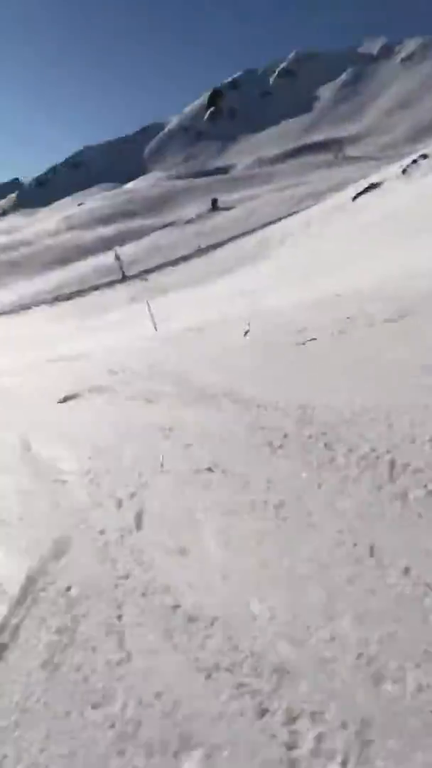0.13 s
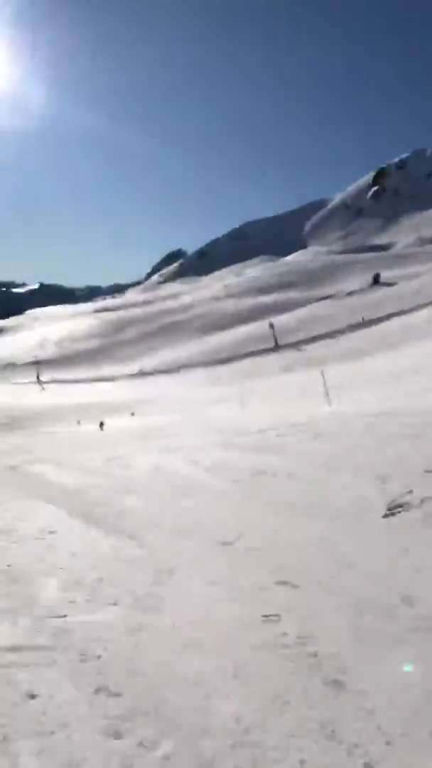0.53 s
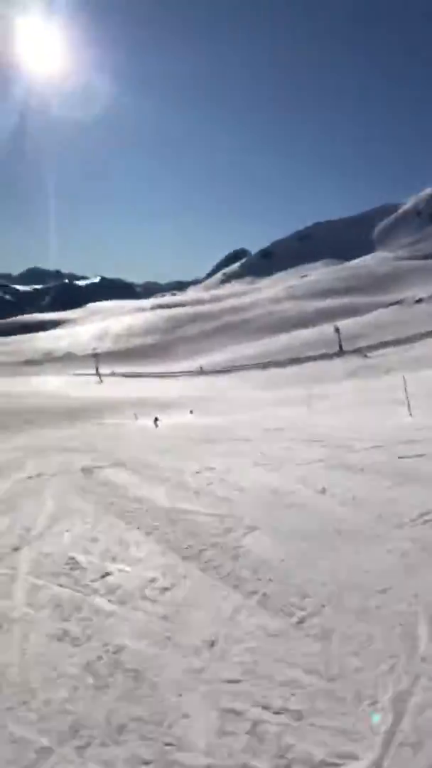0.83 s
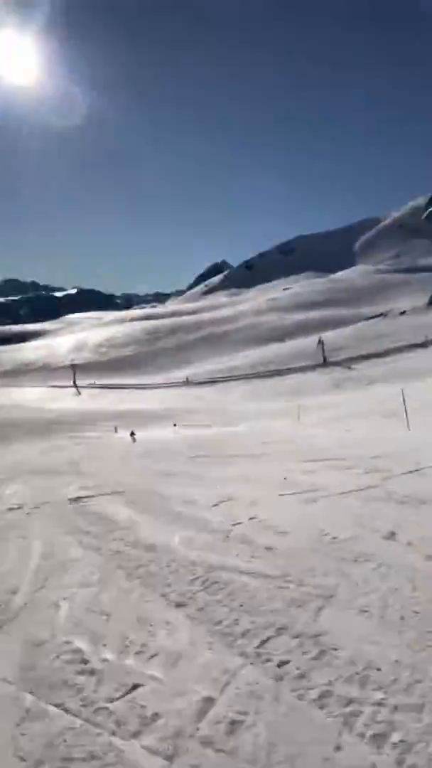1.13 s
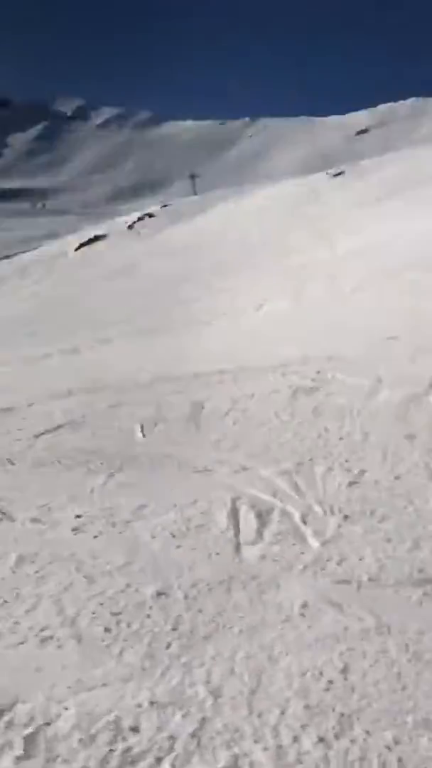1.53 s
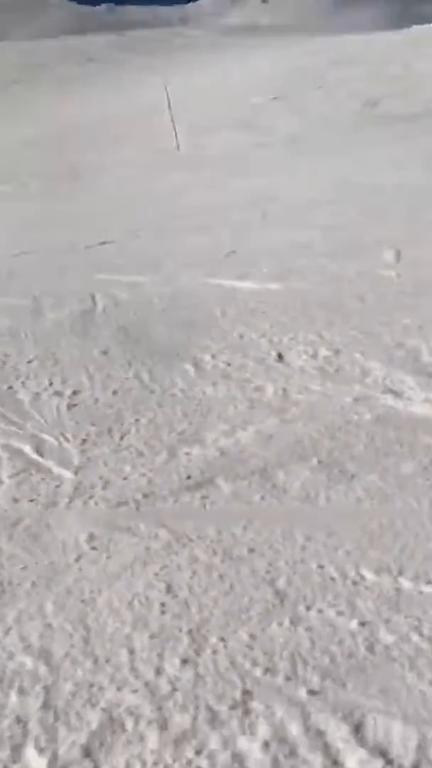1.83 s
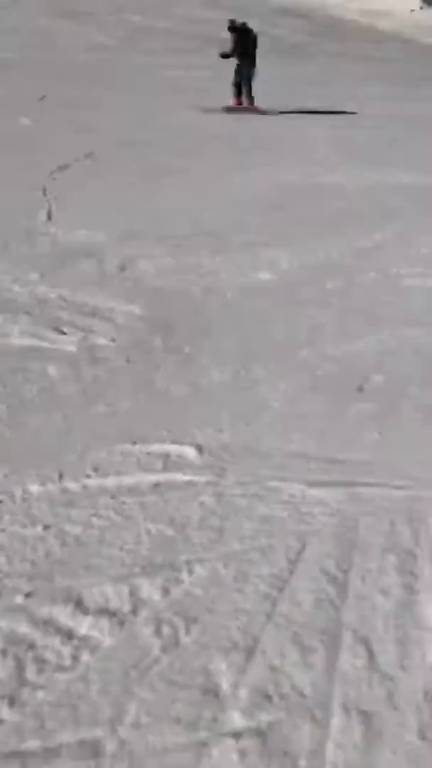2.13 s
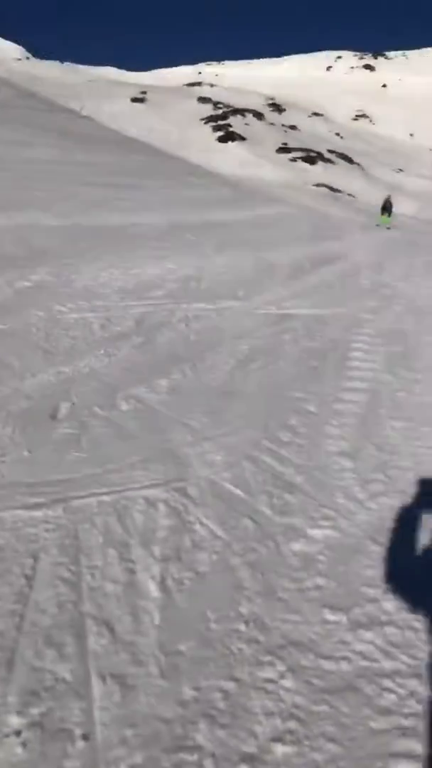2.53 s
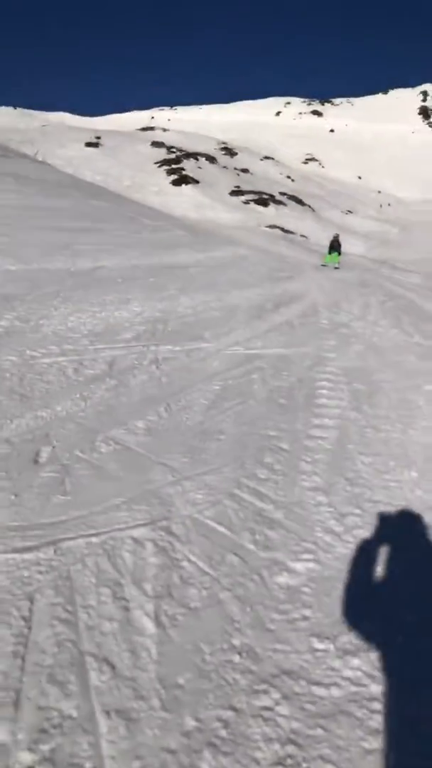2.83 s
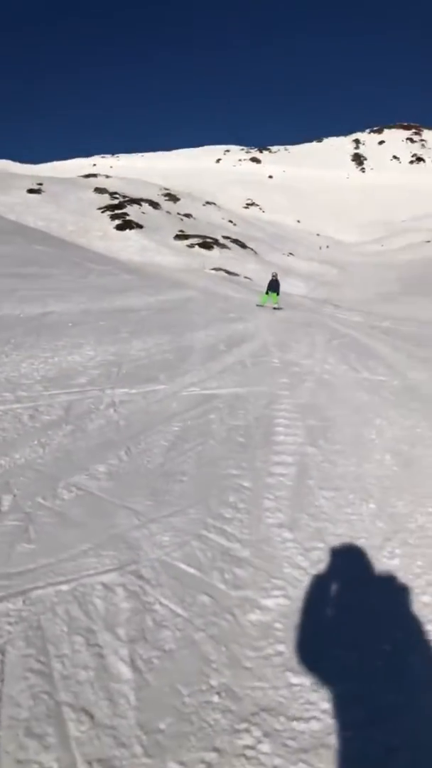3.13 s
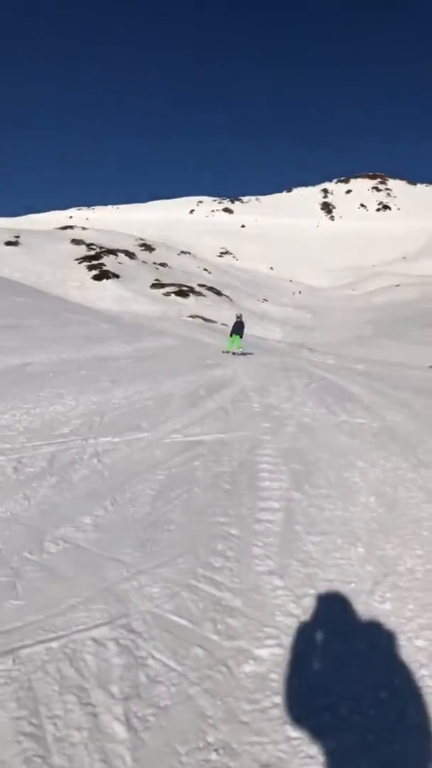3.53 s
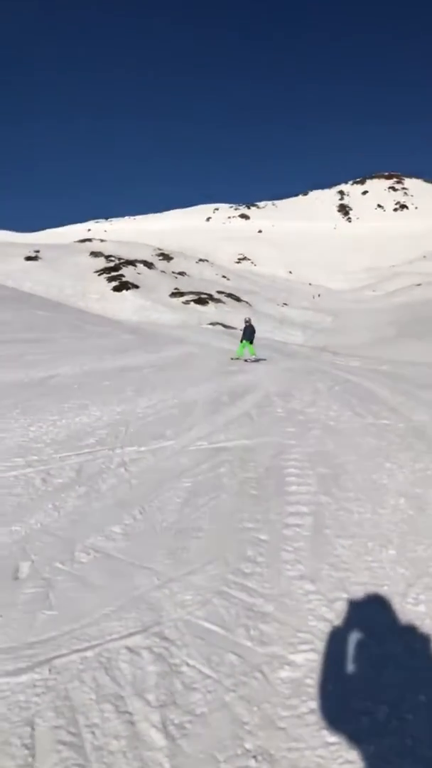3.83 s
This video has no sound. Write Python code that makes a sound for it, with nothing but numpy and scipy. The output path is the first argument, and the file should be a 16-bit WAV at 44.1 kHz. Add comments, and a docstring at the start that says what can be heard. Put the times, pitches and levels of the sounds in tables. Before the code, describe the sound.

Loud gritty scraping of a board on packed snow starts at once, with low rumble, hollow knocks and some wind buffeting. From 0.25 s spray hisses brightly, and the rough, ringing scrape continues until about 2 s. It then smooths and fades, ending in a tiny knock at 2.9 s. Near quiet follows: soft handling thumps, a very faint rising squeak at 3.2 s, a crunch at 3.7 s, and a distant skier's thin hiss growing.

```python
"""Carving to a stop on packed snow

A rider carves across an open slope, brakes sideways and comes to rest; one microphone, held in the hand.
Snow grains crush under the base and set the board ringing: random clicks into decaying sines, over coloured noise.
Spray hisses off the edge and wind buffets the microphone, both as noise on drifting levels.
After the stop: a knock, crunches underfoot, soft thumps as the hand shifts, a faint rising tone,
and the thin hiss of another skier coming nearer."""
import sys
import numpy as np
from scipy import signal
from scipy.fft import rfft, irfft
from scipy.io import wavfile

SR = 44100
rng = np.random.default_rng(int(sys.argv[2]) if len(sys.argv) > 2 else 0)


def pcm_store(signal):
    """Save signal as 16-bit PCM."""
    levels = np.round(np.clip(np.atleast_2d(signal), -1, 1) * 32767)
    wavfile.write(sys.argv[1], SR, levels.astype(np.int16).T)


N = 176400   # samples: 4 s


def from_db(db):
    """Decibels to amplitude."""
    return 10 ** (np.asarray(db) / 20)


def rms_one(x):
    """Scale to an rms of 1."""
    return x / np.sqrt(np.mean(x ** 2) + 1e-20)


def seconds():
    """The time of every sample, in s."""
    return np.arange(N) / SR


def in_time(rows, before=None, after=None):
    """Straight lines between the rows' points, one curve for each column after the time."""
    s, *columns = np.transpose(rows)
    return [np.interp(seconds(), s, column, left=before, right=after) for column in columns]


def drift(rate_hz):
    """Slow chance with spread 1: noise through two equal low-pass poles, drawn at every 20th sample."""
    step = 20
    pole = np.exp(-2 * np.pi * rate_hz * step / SR)
    noise = rng.standard_normal(N // step + 2002)
    slow = signal.lfilter([1], [1, -2 * pole, pole * pole], noise)[2000:]   # skip the filter's start
    return np.interp(np.arange(N) / step, np.arange(len(slow)), rms_one(slow))


def ring(clicks, hz, t60_s):
    """A resonance: a unit click sets off a sine of height 1 that falls 60 dB in t60_s."""
    radius = from_db(-60 / (t60_s * SR))
    angle = 2 * np.pi * hz / SR
    tiny = 1e-18   # keeps the filter out of very slow arithmetic
    return signal.lfilter([0, np.sin(angle)], [1, -2 * radius * np.cos(angle), radius * radius], clicks + tiny)


def random_sizes_db(spread_db):
    """Mostly small, now and then large: exponential chance, capped at five times the spread."""
    return spread_db * np.minimum(rng.exponential(1, N), 5)


def coloured(spectrum, grit_db=0.0):
    """Noise with the given colour and an rms of 1; grit makes single samples stand out."""
    hz, db = np.transpose(spectrum)
    bins_hz = np.maximum(np.arange(N // 2 + 1) * SR / N, 1)
    noise = rng.standard_normal(N) * from_db(random_sizes_db(grit_db))
    colour = from_db(np.interp(np.log(bins_hz), np.log(hz), db))
    return rms_one(irfft(rfft(noise) * colour, N))


# Four layers of the glide: time_s, rumble_db, scrape_db, spray_db, spray_top_db
GLIDE_LEVELS = [(0, -31.5, -32, -40, -40), (.23, -35, -36, -40, -40), (.26, -43, -44, -35.5, -36),
                (.3, -35, -33.5, -34.5, -34), (.8, -38.5, -29.5, -31.5, -34), (1.05, -40, -33, -32.5, -36),
                (1.4, -41, -34, -35, -37.5), (1.65, -40, -31, -36.5, -39.5),
                (1.95, -40.5, -35.5, -39.5, -42.5), (2.2, -44.5, -42, -46, -50.5),
                (2.33, -48, -46, -47, -53.5), (2.5, -53, -49.5, -53, -62.5), (2.52, -57, -55, -58, -64),
                (2.75, -66, -57, -60.5, -65.5), (2.9, -63, -63, -66, -79)]
# Level of the board's ringing, off after the last row: time_s, level_db
RINGING_LEVEL = [(0, -48), (.26, -40), (.5, -44), (.68, -35), (.75, -36.5), (1.08, -35), (1.16, -41),
                 (1.3, -36), (1.62, -39), (2.05, -50), (2.33, -44), (2.5, -73)]
# Colour of the low rumble of the board: freq_hz, relative_db
RUMBLE_COLOUR = [(59, -35), (100, -17), (151, -3), (249, -1), (700, -3), (910, -2), (1200, -61)]
# Colour of the scrape, also of the puffs at the knocks: freq_hz, relative_db
SCRAPE_COLOUR = [(290, -27), (500, -12), (1180, -2.5), (1780, -5), (2600, -18.5), (4000, -33)]
# Colour of the spray off the edge: freq_hz, relative_db
SPRAY_COLOUR = [(1290, -13), (2200, -0.5), (2460, -3), (3320, -0.5), (5850, -4), (8000, -12), (11500, -40)]
# Colour of the top of the spray: freq_hz, relative_db
SPRAY_TOP_COLOUR = [(4120, -12), (7000, -4.5), (9340, -4.5), (15700, -5)]
# Modes of the board, also rung by the knocks: freq_hz, relative_db, undamped_t60_s
BOARD_MODES = [(150, -16, .07), (330, -14, .035), (780, -8, .025), (1050, -11, .012), (1340, 1, .06),
               (1530, -8, .04), (1750, -8, .04), (3290, -17, .025), (5130, -19, .025)]
GRAINS_PER_S, GRAIN_SPREAD_DB = 1500, 2
CHATTER_HZ, CHATTER_DB = 25, 0.55   # ridges in the snow shake every layer together
SMOOTH_FROM_S, SMOOTH_SHARE = 2.3, 0.25   # the slow slide at the end is hardly shaken
STOP_S, STOP_DB_PER_S = 2.91, 158   # the board comes to rest


def grain_ringing():
    """Crushed grains click at random, up or down, and ring every mode of the board; rms 1."""
    sizes = from_db(random_sizes_db(GRAIN_SPREAD_DB)) * rng.choice([-1, 1], N)
    grains = sizes * (rng.random(N) < GRAINS_PER_S / SR)
    return rms_one(sum(from_db(db + 2.0 * drift(22)) * ring(grains, hz, t60_s)
                       for hz, db, t60_s in BOARD_MODES))


def glide():
    """Rumble, scrape, ringing and spray, each on its level, all shaken by the same ridges."""
    rumble_db, scrape_db, spray_db, top_db = in_time(GLIDE_LEVELS)
    ring_db, = in_time(RINGING_LEVEL, after=-120)
    t = seconds()
    ridges_db = CHATTER_DB * drift(CHATTER_HZ) * np.where(t < SMOOTH_FROM_S, 1, SMOOTH_SHARE)

    # each layer takes its share of the ridges; some also waver on their own
    ringing = from_db(ring_db + 0.36 * ridges_db) * grain_ringing()
    rumble_db = rumble_db + 0.44 * ridges_db + 2.33 * drift(14.4)
    rumble = from_db(rumble_db) * coloured(RUMBLE_COLOUR, grit_db=4.5)
    scrape = from_db(scrape_db + ridges_db) * coloured(SCRAPE_COLOUR, grit_db=5.5)
    spray_db = spray_db + 0.8 * ridges_db + 0.9 * drift(43)
    spray = from_db(spray_db) * coloured(SPRAY_COLOUR, grit_db=3.5)
    top_db = top_db + 0.274 * ridges_db + 1.06 * drift(30)
    spray_top = from_db(top_db) * coloured(SPRAY_TOP_COLOUR, grit_db=1.7)

    moving = from_db(-STOP_DB_PER_S * np.maximum(t - STOP_S, 0))
    return moving * (rumble + scrape + ringing + spray + spray_top)


# Ridges and lumps that knock the board: start_s, strength_db, favoured_mode_hz
KNOCKS = [(.004, -10.5, 1050), (0.048, -11.5, 1340), (.133, -13, 780), (.157, -19.5, 1340),
          (.2318, -14, 1050), (.2775, -13.5, 5130), (0.279, -20.5, 1340), (0.443, -17, 1340),
          (0.486, -19, 1340), (0.527, -17, 1750), (0.543, -17.5, 150), (0.591, -22.5, 1340),
          (0.711, -16.5, 1340), (.781, -15.5, 1340), (.843, -15, 1340), (0.875, -15, 1340),
          (1.002, -12.5, 1750), (1.038, -14.5, 1340), (1.077, -16.5, 1340), (1.211, -18.5, 1340),
          (1.313, -18, 1340), (1.545, -16.5, 1340), (1.63, -19, 1340), (1.836, -18, 1340),
          (1.887, -21, 780), (1.971, -18.5, 1340), (2.04, -20.5, 1340), (2.121, -24.5, 330),
          (2.29, -26, 3290), (2.306, -28.5, 3290), (2.475, -32, 1530), (2.485, -31, 330)]
KNOCK_SPREAD_S = .004   # the modes are set off at slightly different moments
FAVOURED_DB = -7   # the favoured mode, against the knock's strength
KNOCK_RING_DB, KNOCK_DAMPING = -10.5, 0.24   # the other modes: level, share of t60 left
KNOCK_PUFF_S, KNOCK_PUFF_DB = 0.0075, -15   # time constant and level of the puff of snow
CRACK_HZ, CRACK_T60_S, CRACK_DB = 1150, 0.0041, -8   # the dry edge of each knock


def knocks():
    """Each knock cracks, rings the modes unevenly, one of them freely, and throws a short puff of snow."""
    s, db, favoured_hz = np.transpose(KNOCKS)
    at = (s * SR).astype(int)
    uneven_db = rng.normal(0, 1.3, (len(s), len(BOARD_MODES)))
    late = (rng.uniform(0, KNOCK_SPREAD_S, uneven_db.shape) * SR).astype(int)
    modes = 0
    for k, (hz, mode_db, t60_s) in enumerate(BOARD_MODES):
        free = np.abs(np.log(favoured_hz / hz)) < .07   # knocks that favour this mode
        click_db = db + np.where(free, FAVOURED_DB, mode_db + KNOCK_RING_DB + uneven_db[:, k])
        damped_and_free = np.zeros((2, N))
        damped_and_free[free.astype(int), at + late[:, k]] = from_db(click_db)
        modes = modes + ring(damped_and_free[0], hz, t60_s * KNOCK_DAMPING)
        modes = modes + ring(damped_and_free[1], hz, t60_s)

    clicks = np.zeros(N)
    clicks[at] = from_db(db)
    fade = signal.lfilter([1], [1, -np.exp(-1 / (KNOCK_PUFF_S * SR))], clicks + 1e-18)
    puff = from_db(KNOCK_PUFF_DB) * fade * coloured(SCRAPE_COLOUR)
    crack = from_db(CRACK_DB) * ring(clicks, CRACK_HZ, CRACK_T60_S)
    return modes + puff + crack


# The last knock, two ticks then a thud: start_s, level_db, pitch_hz, t60_s
SETTLE = [(2.9093, -40, 1250, .014), (2.9104, -42, 1800, .01), (2.9117, -38, 380, .018)]


def settle():
    """The board drops flat as it stops: single clicks, each ringing one decaying sine."""
    return sum(from_db(db) * ring(1. * (np.arange(N) == int(s * SR)), hz, t60_s)
               for s, db, hz, t60_s in SETTLE)


# Snow crunches underfoot: start_s, length_s, level_db
CRUNCHES = [(3.207, .025, -67), (3.725, 0.016, -56.5), (3.74, 0.05, -62)]
# Colour of the crunches: freq_hz, relative_db
CRUNCH_COLOUR = [(350, -48), (600, -9), (887, -8), (1540, -2), (2600, -12), (4900, -60)]


def crunches():
    """Soft bursts of gritty noise that rise fast and fade."""
    envelope = 0
    for s, length_s, db in CRUNCHES:
        share = np.clip((seconds() - s) / length_s, 0, 1)
        envelope = envelope + from_db(db) * np.sqrt(share) * (1 - share) ** 2 * 3
    return envelope * coloured(CRUNCH_COLOUR, grit_db=2.0)


# The hand shifts on the microphone; the time is a zero crossing inside the thump: crossing_s, level_db, pitch_hz
THUMPS = [(3.059, -61, 53.8), (3.289, -54, 80), (3.464, -50.5, 56.5), (3.554, -51.5, 51.7),
          (3.884, -56, 91.5), (3.983, -52, 80.7)]
THUMP_CYCLES = 2.1   # whole length of a thump


def handling():
    """The hand shifts: soft low sines of a few cycles, swelling and fading."""
    out = 0
    for s, db, hz in THUMPS:
        cycles = (seconds() - s) * hz
        share = np.clip(cycles / THUMP_CYCLES + 0.38, 0, 1)   # the thump begins before its crossing
        out = out + from_db(db) * np.sin(2 * np.pi * cycles) * np.sin(np.pi * share) ** 2
    return out


SQUEAK_S, SQUEAK_LENGTH_S, SQUEAK_DB = 3.2, 0.14, -73
SQUEAK_HZ, SQUEAK_RISE_HZ = 740, 110


def squeak():
    """A faint unsteady tone whose pitch rises fast, then more slowly."""
    share = np.clip((seconds() - SQUEAK_S) / SQUEAK_LENGTH_S, 0, 1)
    pitch_hz = SQUEAK_HZ + SQUEAK_RISE_HZ * np.sqrt(share)
    tone = np.sin(2 * np.pi * np.cumsum(pitch_hz) / SR)
    return from_db(SQUEAK_DB + 4.0 * drift(40)) * np.sin(np.pi * share) * tone


# Another skier coming nearer: time_s, level_db
FAR_SKIER_LEVEL = [(3.0, -80), (3.3, -69.5), (3.85, -63), (4.0, -63)]
# Colour of the far skier's thin hiss: freq_hz, relative_db
FAR_SKIER_COLOUR = [(1470, -37.5), (2500, -12.5), (5400, -3), (7870, -5.5), (9620, -4.5), (15700, -19)]


def far_skier():
    """Gritty high noise that grows as the other skier comes nearer."""
    level_db, = in_time(FAR_SKIER_LEVEL)
    return from_db(level_db + .8 * drift(15)) * coloured(FAR_SKIER_COLOUR, grit_db=3.0)


# Wind on the microphone: time_s, level_db
WIND_LEVEL = [(0, -38), (.23, -41.5), (.28, -58), (.6, -57), (1.25, -63.5), (1.75, -49), (2.2, -58.5),
              (2.6, -70), (3.7, -70.5), (4.0, -63.5)]
# Colour of the wind: freq_hz, relative_db
WIND_COLOUR = [(12, -41), (20, -30), (50, -1.5), (90, 0), (200, -2.5), (300, -52)]


def wind():
    """Wind buffets the microphone: low noise on a wavering level."""
    level_db, = in_time(WIND_LEVEL)
    return from_db(level_db + 2.0 * drift(8.2)) * coloured(WIND_COLOUR)


# Colour of the open air: freq_hz, relative_db
AIR_COLOUR = [(24, -33), (40, -15), (193, -19.5), (487, -22.5), (803, -26.5), (1700, -26.5), (5510, -32.5),
              (15700, -37.5)]
AIR_DB = -66


def open_air():
    """The slope's background: steady noise, strongest in the lows."""
    return from_db(AIR_DB) * coloured(AIR_COLOUR)


BOARD_LOW_CUT_HZ = 113


def scene():
    """Board and snow without their lows, then the hand, the far skier, wind and air; both channels alike."""
    low_cut = signal.butter(4, BOARD_LOW_CUT_HZ, "high", fs=SR, output="sos")
    board = signal.sosfilt(low_cut, glide() + knocks() + crunches())
    mono = board + settle() + handling() + squeak() + far_skier() + wind() + open_air()
    return np.stack([mono, mono])


CUTOFF_HZ = 15890


def record(dry):
    """The top is cut steeply by an elliptic low-pass."""
    return signal.sosfilt(signal.ellip(14, .3, 60, CUTOFF_HZ, fs=SR, output="sos"), dry)


dry = scene()
out = record(dry)
pcm_store(out)
```